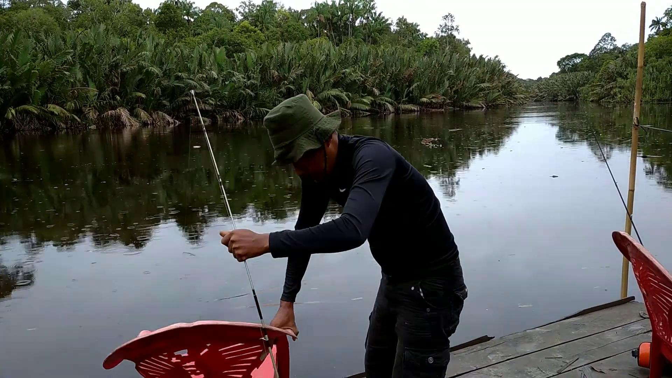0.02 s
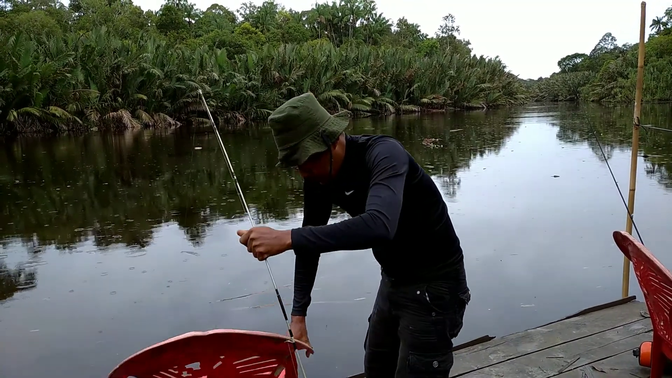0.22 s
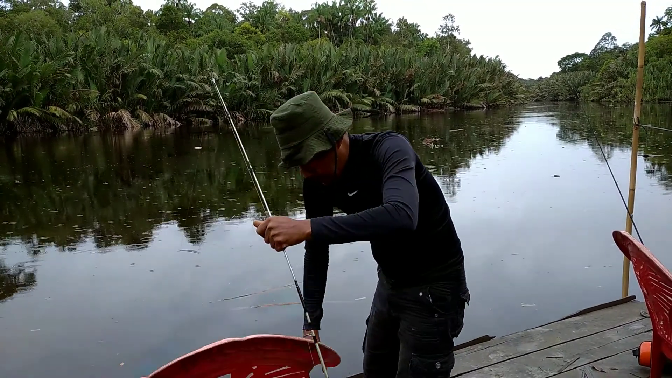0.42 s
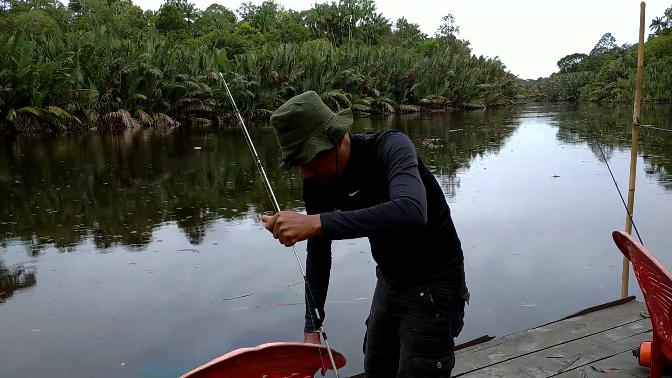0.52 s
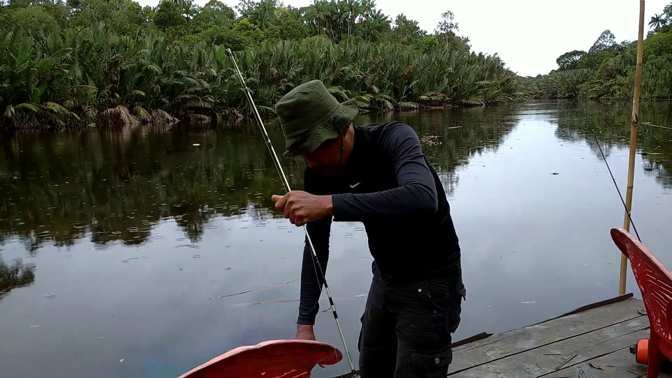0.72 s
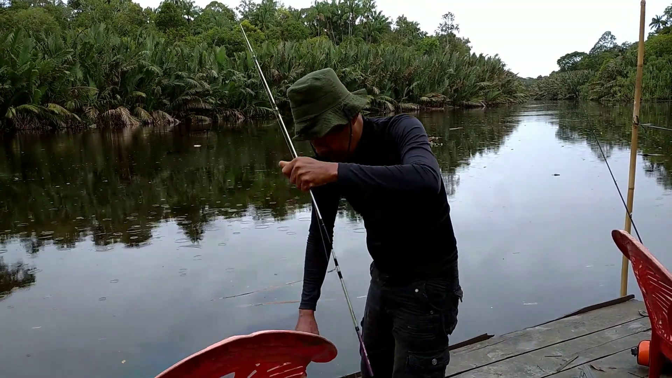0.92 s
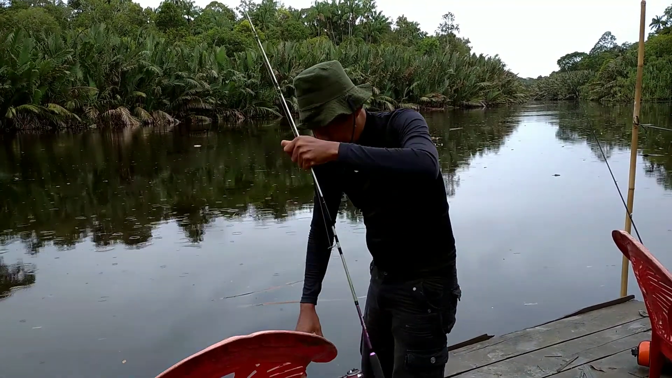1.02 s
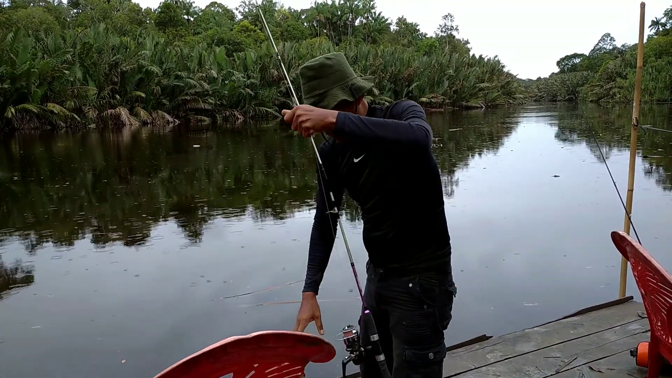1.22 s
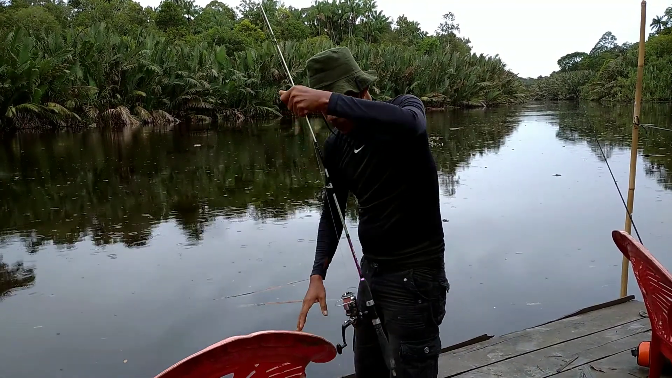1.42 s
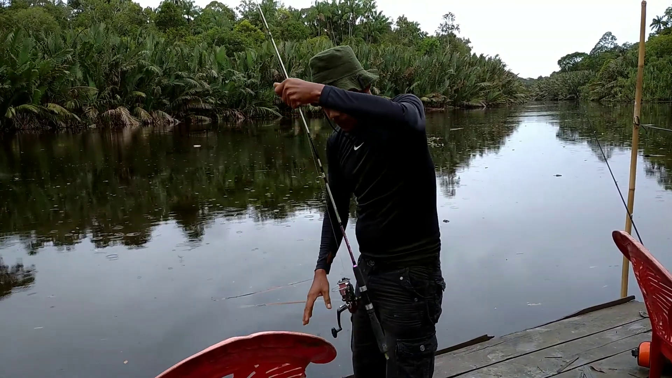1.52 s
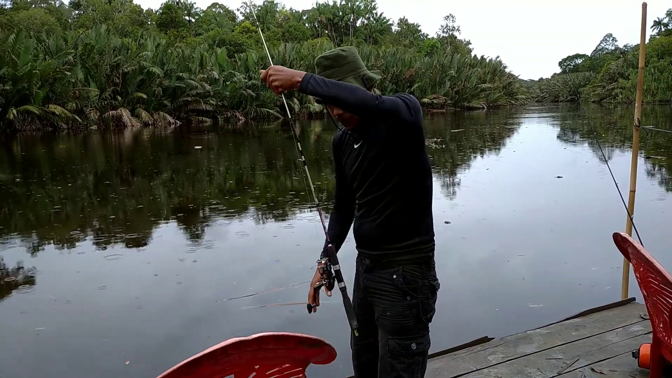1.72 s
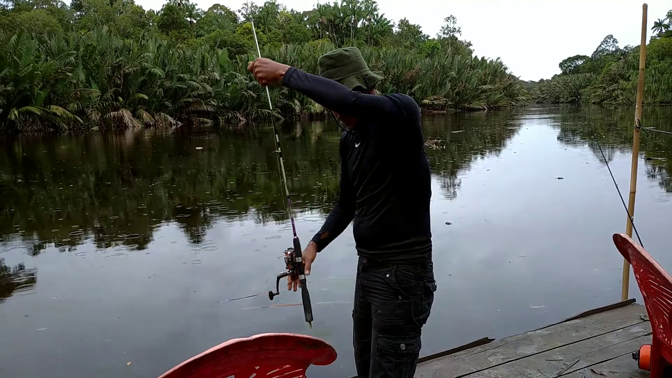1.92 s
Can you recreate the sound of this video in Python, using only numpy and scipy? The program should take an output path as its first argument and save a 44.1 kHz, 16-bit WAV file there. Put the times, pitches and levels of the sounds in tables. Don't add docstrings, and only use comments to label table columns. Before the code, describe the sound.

Close in stereo, short rough chair slips build to clustered plastic-and-wood knocks, pause, knock again and stop; afterwards only quiet steps on boards, a thin pulsing insect and far bird whistles over smooth water hiss.

```python
import sys
import numpy as np
from scipy import signal
from scipy.fft import rfft, irfft
from scipy.io import wavfile
from scipy.ndimage import uniform_filter1d

SR = 44100
rng = np.random.default_rng(int(sys.argv[2]) if len(sys.argv) > 2 else 0)


def to_wav(s):
    ch = np.atleast_2d(s).T
    pcm = np.round(np.clip(ch, -1, 1) * 32767)
    wavfile.write(sys.argv[1], SR, pcm.astype(np.int16))


def field_ratio(decibels):
    return 10 ** (np.asarray(decibels, dtype=float) / 20)


N = 88200

# start_s, length_s, shell_db, grit_db, plank_db
SLIPS = [(0, 0.0094, -49, -52, -35), (0.015, 0.026, -52, -62, -46.5), (0.047, 0.045, -52.5, -58, -46),
         (0.066, 0.04, -65, -62, -45.5), (0.121, 0.06, -47.5, -54, -39.5), (0.189, 0.02, -48, -55.5, -39),
         (0.212, 0.031, -45.5, -53, -40.5), (0.256, 0.019, -39, -43, -43), (0.283, 0.032, -45.5, -44, -41),
         (0.336, 0.028, -34.5, -39.5, -40), (0.362, 0.039, -36, -40.5, -39), (.399, 0.026, -36, -40.5, -43),
         (0.431, .028, -32, -36, -28), (0.46, 0.031, -41.5, -50, -35.5), (0.497, 0.051, -45, -48.5, -36),
         (0.553, 0.052, -56, -60.5, -48), (0.598, 0.097, -54, -59.5, -44), (0.674, 0.014, -32, -47.5, -34),
         (0.686, 0.058, -51, -62.5, -44), (0.748, 0.063, -58.5, -69, -50.5), (0.811, 0.12, -69, -58.5, -59),
         (0.908, 0.06, -41, -45, -31), (0.96, 0.037, -47.5, -46.5, -40.5),
         (0.992, 0.045, -54, -51.5, -43.5), (1.041, 0.042, -66.5, -67, -50),
         (1.089, 0.054, -70.5, -74, -58)]
# start_s, shell_peak_db, shell_contact_hz, plank_peak_db, plank_contact_hz
KNOCKS = [(0.219, -33, 990, -47, 332), (.261, -31.5, 1180, -36, 308), (0.287, -33, 1040, -61, 347),
          (0.337, -35, 1090, -45, 280), (0.3978, -36, 1170, -34, 291), (.434, -22, 1010, -26, 403),
          (0.446, -18.5, 1040, -26, 382), (.449, -25, 1023, -34, 372), (0.456, -32, 1010, -28, 397),
          (0.502, -26, 900, -33, 397), (0.681, -30, 1400, -55, 375), (0.797, -40.5, 690, -38, 205),
          (.912, -18, 1154, -28, 219), (.938, -29, 900, -30, 220), (0.956, -33, 1410, -26.5, 212),
          (.989, -38, 900, -25.5, 310), (.972, -34.5, 1020, -44, 220)]
# mode_hz, width_hz, level_db
SHELL_MODES = [(714, 254, 1), (900, 29, -2), (1043, 170, 3), (1163, 119, 3.5), (1400, 235, -2.5),
               (1630, 89, -3), (1770, 190, -2.5), (2012, 156, -3.5), (2210, 97, -10), (3130, 680, -5),
               (3685, 300, -7), (4500, 780, -8)]
# mode_hz, width_hz, level_db
PLANK_MODES = [(147, 13, -9), (183.4, 16, 5.5), (220, 18, 4), (251, 20.5, 0.5), (313, 59, 2),
               (363.3, 37, 4), (413.5, 42, -5.5), (510, 55, -2.5)]
# freq_hz, density_db_per_hz
GRIT_SPECTRUM = [(880, -7), (1500, -2.5), (2340, 1), (2720, -4), (4520, -10), (5460, -21.5), (7740, -8.5),
                 (10700, -20), (14300, -38)]
FLEX_RATIOS = (.95, 1.03, .98, 1.06)
# start_s, peak_db, pitch_hz
FOOTFALLS = [
    (0, -34, 139),
    (.135, -39, 159),
    (.465, -31, 168.3),
    (1.344, -47.5, 148),
    (1.392, -49, 142),
    (1.41, -47.5, 165),
    (1.672, -63, 152),
    (1.807, -41, 139),
    (1.821, -48, 247),
    (1.85, -47, 165),
]
# start_s, peak_db, pitch_hz
TICKS = [
    (.503, -27.5, 2150),
    (.504, -36.5, 4500),
    (.913, -23.5, 1944),
    (.857, -38.5, 2450),
    (1.81, -53, 1990),
    (1.819, -51, 2850),
    (1.897, -49.5, 2260),
    (1.898, -49, 3550),
]
# start_s, peak_db, pitch_hz
LEG_CATCHES = [(.058, -38.5, 1090), (.082, -41.5, 1170), (.128, -40.5, 2060), (.138, -33, 161),
               (.218, -32, 1050), (.262, -34, 1137), (.29, -35, 1080), (.339, -30.5, 1115),
               (.351, -33, 1830), (.366, -33.5, 1700), (.383, -33.5, 1250), (.378, -27, 1630),
               (.3995, -25, 1114), (.403, -29.5, 1400), (.362, -33, 243), (.371, -31, 243),
               (.435, -22.5, 340), (.4445, -20.5, 382), (.449, -22, 393), (.454, -22.5, 384),
               (.487, -36.5, 302), (.447, -17.5, 1066), (.454, -29.5, 2200), (.464, -29, 243.7),
               (.475, -29, 295), (.505, -30.5, 330), (.514, -26.5, 161), (.524, -32, 190),
               (.6805, -27.5, 1006), (.681, -29.5, 1386), (.684, -27, 1630), (.684, -25, 749),
               (.6125, -42.5, 334), (.687, -26, 380), (.703, -34, 273), (.712, -36.5, 262),
               (.914, -22, 217), (.912, -30, 1990), (.923, -25.5, 271), (.932, -29.5, 226),
               (.941, -26.5, 207), (.955, -27, 240), (.98, -31, 204), (.989, -29, 322), (1.0, -37, 312),
               (1.022, -32, 220), (1.045, -43, 265), (1.053, -43, 231), (1.072, -45, 258)]
# freq_hz, density_db_per_hz
RIVER_BODY = [(40, -2), (90, 5), (200, -5.5), (450, -5), (1200, -12), (2100, -5.5), (3300, -10.5),
              (4500, -8.5)]
# freq_hz, gain_db
RIVER_TOP = [(4500, 4), (5600, 6.5), (6800, 7), (8200, 4), (9200, -8), (11000, -17), (13000, -6),
             (14300, -18)]
# freq_hz, correlation
RIVER_LIKENESS = [(60, 0.27), (230, -0.21), (910, 0.234), (3570, -0.22), (14000, 0.034)]
# start_s, length_s, level_db, start_hz, end_hz
BIRDS = [
    (1.28, .045, -70, 4000, 4620),
    (1.325, .045, -72, 4620, 4650),
    (1.372, .035, -68, 4560, 3950),
    (1.4, .05, -76, 4550, 4300),
    (1.44, .1, -78, 4400, 3900),
    (1.965, .025, -70, 4750, 4300),
    (1.08, .19, -73, 1230, 1160),
]
# freq_hz, left_over_right_db
PORT_LEAN = [(60, 11), (100, 13.5), (420, 14), (500, 0.3), (800, 0), (1150, 3.5), (2000, 0.5), (3300, -2),
             (8000, 3), (13000, 0)]
# freq_hz, left_lead_rad
PORT_LEAD = [(60, 0), (400, -.18), (1150, -.3), (1800, -1.7), (2400, -2), (2850, -3.1), (4700, -7.4),
             (8000, -7.9)]


def evened(x):
    return x / np.sqrt(np.mean(x ** 2) + 1e-20)


def smooth_noise(shape, width):
    return evened(uniform_filter1d(rng.standard_normal(shape), size=width, axis=-1))


def read(points, hz):
    f, value = np.transpose(points)
    return np.interp(np.log(hz + 1), np.log(f + 1), value)


def add(mix, start_s, sound):
    part = mix[..., round(start_s * SR):][..., :sound.shape[-1]]
    part += sound[..., :part.shape[-1]]


def through(x, response):
    return signal.oaconvolve(x, response)[:N]


def high_pass(order, hz):
    return signal.butter(order, hz, "high", fs=SR, output="sos")


def facing(turn, k, count):
    away = abs((turn - k + count / 2) % count - count / 2)
    return np.cos(np.pi / 2 * np.minimum(away, 1))


def ring(modes, flip):
    rattle_db, rattle_t60_s = -15, .2
    t = np.arange(8192) / SR
    body = np.zeros(8192)
    for k, (hz, width_hz, db) in enumerate(modes):
        decay = np.exp(-np.pi * width_hz * t)
        body += flip ** k * field_ratio(db) * np.sqrt(width_hz) * decay * np.sin(2 * np.pi * hz * t)
    rattle = rng.standard_normal(8192) * field_ratio(-60 * t / rattle_t60_s)
    rattle = signal.fftconvolve(rattle / np.linalg.norm(rattle), body)[:8192]
    return body + field_ratio(rattle_db) * rattle


def colour(points):
    db = np.maximum(read(points, abs(np.fft.fftfreq(4096, 1 / SR))), -100)
    log_gain = np.log(field_ratio(db))
    fir = np.fft.ifft(np.exp(np.conj(signal.hilbert(log_gain)))).real[:1024]
    return fir / np.linalg.norm(fir)


def slip_drive():
    catches_per_s, spread_db, rub, stutter_db = 2500, 3.5, .6, 2.5
    catch = field_ratio(spread_db * np.minimum(rng.exponential(1, (5, N)), 4))
    catch = catch * (rng.random(N) < catches_per_s / SR)
    catch = catch * rng.choice([-1., 1.], (5, N))
    drive = np.array([evened(c) for c in catch]) + rub * rng.standard_normal((5, N))
    return drive * field_ratio(stutter_db * smooth_noise((5, N), 180))


def slip_pressure():
    rise_s, release_s, sag_db = 0.0066, 0.0055, -7
    creep_db, creep_s = -20, .007
    t = np.arange(N) / SR
    press = np.zeros((3, N))
    for start_s, length_s, *db in SLIPS:
        u = t - start_s
        shape = np.clip(u / rise_s, 0, 1) ** 2 * field_ratio(sag_db * np.clip(u / length_s, 0, 1))
        shape += field_ratio(creep_db) * np.exp(-abs(u) / creep_s)
        release = np.exp(-np.maximum(u - length_s, 0) / release_s)
        press += field_ratio(np.array(db))[:, None] * shape * release
    return press


def knock_pushes():
    contact_cycles = 2.9
    t = np.arange(1500) / SR
    blows = np.zeros((2, N))
    for start_s, shell_db, shell_hz, plank_db, plank_hz in KNOCKS:
        for blow, db, hz in zip(blows, (shell_db, plank_db), (shell_hz, plank_hz)):
            turns = np.minimum(t * hz, contact_cycles)
            push = np.sin(np.pi * turns / contact_cycles) ** 2 * np.sin(2 * np.pi * turns)
            add(blow, start_s, field_ratio(db) * 2 * push / abs(push).sum())
    return blows


def chair():
    flex_s, apart = .037, .9
    drive, press, blows = slip_drive(), slip_pressure(), knock_pushes()
    grit = signal.oaconvolve(press[1] * drive[2:], colour(GRIT_SPECTRUM)[None], axes=1)[:, :N]
    shell, planks = ring(SHELL_MODES, flip=-1.002), ring(PLANK_MODES, flip=0.96)
    out = grit[0] + through(blows[0] / abs(shell).max(), shell)
    plank_force = press[2] * drive[1] / np.linalg.norm(planks) + blows[1] / abs(planks).max()
    out += through(plank_force, planks)
    turn = np.arange(N) / SR / flex_s
    index = np.arange(len(shell))
    for k, flex in enumerate(FLEX_RATIOS):
        bent = np.interp(index * flex, index, shell)
        out += through(press[0] * drive[0] * facing(turn, k, 4) / np.linalg.norm(bent), bent)
    return out, apart * grit[1:]


def taps(rows, cycles, growth=0.):
    out = np.zeros(N)
    for start_s, db, hz in rows:
        turns = np.arange(4000) / SR * hz
        u = turns / cycles / (hz / 300) ** growth
        add(out, start_s, field_ratio(db) * np.e * u * np.exp(-2 * u) * 2 * np.sin(2 * np.pi * turns))
    return out


def footfalls():
    return taps(FOOTFALLS, cycles=0.91)


def river():
    level_db, patch_db = -59, 2
    notch_hz, notch_width_hz, notch_db = 5240, 426, -15.5
    frames, hz = N // 256 + 5, np.fft.rfftfreq(1024, 1 / SR)
    a, b, c, d, patches = rng.standard_normal((frames, 513, 5)).T
    patches = uniform_filter1d(patches, size=10, axis=0)
    patches = evened(uniform_filter1d(patches, size=12, axis=1))
    same = np.clip(read(RIVER_LIKENESS, hz), -1, 1)[:, None]
    left = a + 1j * b
    z = np.array([left, same * left + np.sqrt(1 - same ** 2) * (c + 1j * d)])
    notch = notch_db * np.exp(-((hz - notch_hz) / notch_width_hz) ** 2)
    spectrum_db = read(RIVER_BODY, hz) + read(RIVER_TOP, hz) + notch
    z *= field_ratio(spectrum_db[:, None] + patch_db * patches) * (hz < 14300)[:, None]
    hiss = signal.istft(z, nperseg=1024, noverlap=768)[1][:, :N]
    return field_ratio(level_db) * evened(hiss)


def insect():
    tone_hz, level_db, uneven_db = 7026, -71.5, 0.76
    throb_s, throb_at_s, sharpness = .069, 1.428, 1.6
    left_right_db = np.array([[1.], [-1.]])
    t = np.arange(N) / SR
    throb = (.5 + .5 * np.cos(2 * np.pi * (t - throb_at_s) / throb_s)) ** sharpness
    uneven = field_ratio(uneven_db * smooth_noise(N, 2500))
    tone = field_ratio(level_db) * 2 * throb * uneven * np.sin(2 * np.pi * tone_hz * t)
    return tone * field_ratio(left_right_db)


def leg_catches():
    return taps(LEG_CATCHES, cycles=1.7, growth=.5)


def tackle_ticks():
    return taps(TICKS, cycles=2.4)


def birds():
    arch, fuzz_depth, flutter_db = 0.0128, .026, 3.5
    echo_db, echo_t60_s = -1, .35
    out = np.zeros(N)
    for start_s, length_s, db, start_hz, end_hz in BIRDS:
        u = np.arange(round(length_s * SR)) / (length_s * SR)
        fuzz, flutter = smooth_noise((2, 12000), 300)[:, :len(u)]
        hz = start_hz + (end_hz - start_hz) * u
        hz += start_hz * (arch * np.sin(np.pi * u) + fuzz_depth * fuzz)
        whistle = np.sqrt(np.sin(np.pi * u)) * np.sin(2 * np.pi * np.cumsum(hz) / SR)
        add(out, start_s, field_ratio(db + flutter_db * flutter) * 2 * whistle)
    tail = rng.standard_normal((2, 15000)) * field_ratio(-60 * np.arange(15000) / SR / echo_t60_s)
    tail /= np.linalg.norm(tail[0])
    return out + field_ratio(echo_db) * signal.fftconvolve(out[None], tail, axes=1)[:, :N]


def scatter(x):
    echo_db, t60_s, low_cut_hz, turn_s = 0, .03, 1300, .05
    tails = rng.standard_normal((6, 2, 3000)) * field_ratio(-60 * np.arange(3000) / SR / t60_s)
    tails = signal.lfilter(*signal.butter(3, low_cut_hz, "high", fs=SR), tails / np.linalg.norm(tails[0, 0]))
    turn = np.arange(N) / SR / turn_s
    out = np.zeros((2, N))
    for k, tail in enumerate(tails):
        out += field_ratio(echo_db) * signal.fftconvolve(x[None] * facing(turn, k, 6), tail, axes=1)[:, :N]
    return out


def ports(x):
    hz = np.fft.rfftfreq(N, 1 / SR)
    half = field_ratio(read(PORT_LEAN, hz) / 2) * np.exp(.5j * read(PORT_LEAD, hz))
    gains = np.array([half, 1 / half]) * 2 / (abs(half) + 1 / abs(half))
    return irfft(rfft(x) * gains, N) + scatter(x)


def scene():
    dragged, wide_grit = chair()
    dragged = signal.sosfiltfilt(high_pass(2, 107), dragged + leg_catches())
    near = dragged + footfalls() + tackle_ticks()
    return ports(near) + wide_grit + river() + insect() + birds()


def low_pass(x):
    return signal.sosfilt(signal.butter(12, 14550, fs=SR, output="sos"), x)


def record(dry):
    low_cut_hz, top_hz = 97, 14260
    heard = signal.sosfilt(high_pass(2, low_cut_hz), dry)
    heard = irfft(rfft(heard) * (np.fft.rfftfreq(N, 1 / SR) < top_hz), N)
    return low_pass(heard)


dry = scene()
out = record(dry)
to_wav(out)
```